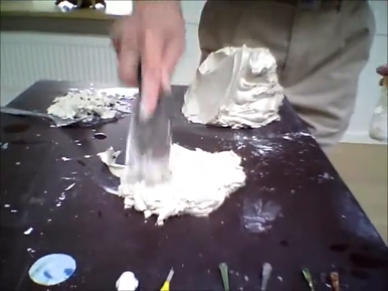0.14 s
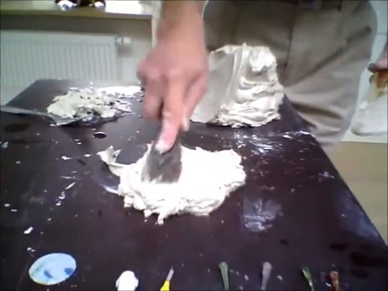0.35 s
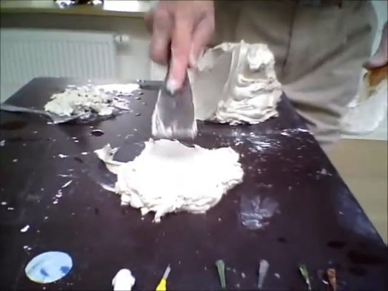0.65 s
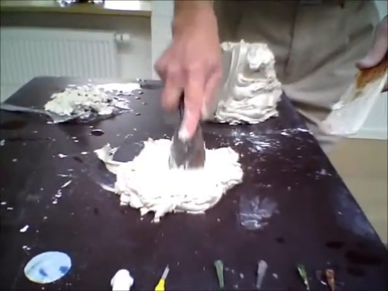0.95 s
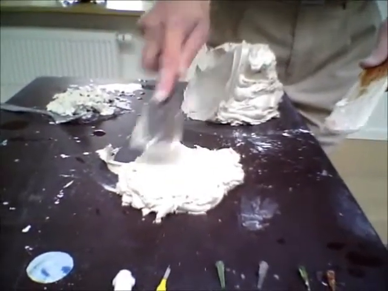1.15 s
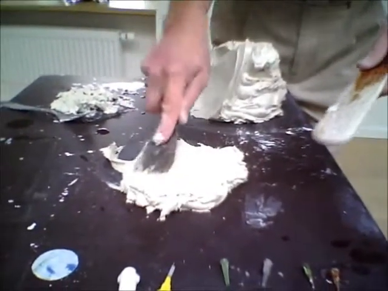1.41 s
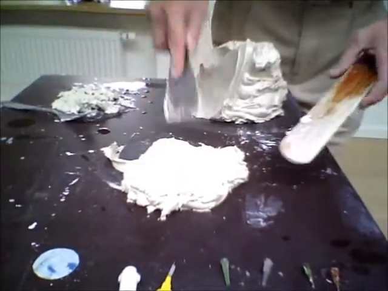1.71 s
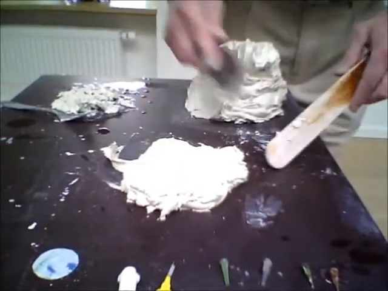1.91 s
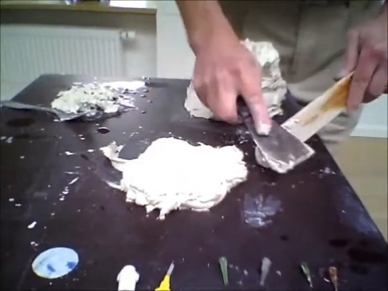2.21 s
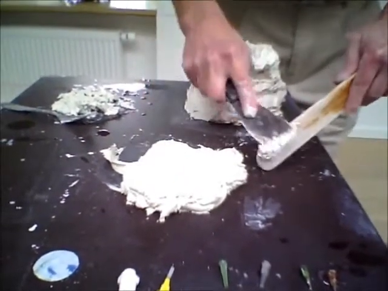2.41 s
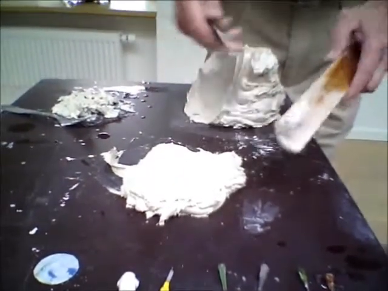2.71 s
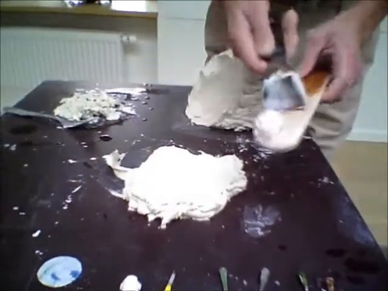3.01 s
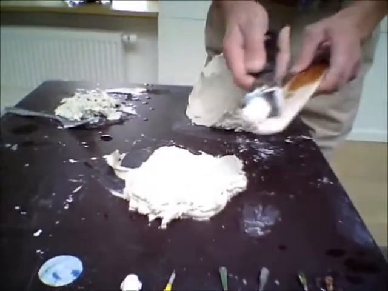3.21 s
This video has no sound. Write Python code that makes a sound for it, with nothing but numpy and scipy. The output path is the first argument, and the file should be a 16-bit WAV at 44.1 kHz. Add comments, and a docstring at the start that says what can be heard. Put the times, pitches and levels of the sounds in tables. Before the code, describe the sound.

A steel palette knife pats and smears sticky clay on a table with light ticks. It knocks twice on a wooden spatula, scrapes off with a loud clack, then taps and wipes. Close microphone, slightly live room, faint hum.

```python
"""A steel palette knife pats and smears soft clay on a table. The blade ticks on the tabletop, knocks three
times against a wooden spatula, scrapes along it and snaps off its end with a loud clack; then it taps the
spatula again and wipes the clay onto it. Blows ring as decaying modes; rubbing is a stream of tiny slips,
filtered by steel or clay. The room is slightly live, with a faint hum."""
import sys
import numpy as np
from scipy import signal
from scipy.fft import rfft, irfft
from scipy.io import wavfile

SR = 44100
rng = np.random.default_rng(int(sys.argv[2]) if len(sys.argv) > 2 else 0)


def unload_wav(signal):
    """Save mono or channel-first audio to the path in sys.argv[1] as 16-bit WAV at rate SR, clipped to [-1, 1]."""
    wavfile.write(
        sys.argv[1],
        SR,
        np.round(np.clip(np.atleast_2d(signal).T, -1, 1) * 32767).astype(np.int16),
    )


N = 147735
T, F = np.arange(N) / SR, np.fft.rfftfreq(2 * N, 1 / SR)


def amp(db):
    """Decibels to gain."""
    return 10 ** (np.asarray(db) / 20)


def unit(x):
    """Scale to rms 1."""
    return x / np.std(x)


def peak(x, db):
    """Scale to a peak level."""
    return x * amp(db) / np.abs(x).max()


def burst(x, db):
    """Scale to the energy of 10 ms at this rms level."""
    return x * amp(db) * np.sqrt(SR / 100 / np.sum(x ** 2))


def puff(noise, s, decay_s, db):
    """Noise burst with a sharp onset."""
    t = T[:SR // 20]
    return burst(noise[int(s * SR):][:len(t)] * np.exp(-t / decay_s), db)


def add(track, s, sound):
    """Mix a sound in at s seconds."""
    i = int(s * SR)
    track[i:i + len(sound)] += sound[:N - i]


def across(points):
    """Join (Hz, value) points on a log-frequency axis."""
    hz, value = np.array(points, float).T
    return np.interp(np.log(F + 1), np.log(hz), value)


def colour(points):
    """Response through (Hz, dB) points."""
    return amp(across(points))


def resonances(rows):
    """Response of (Hz, width Hz, dB) resonances."""
    return sum(amp(db) * 1j * F * width / (hz ** 2 - F ** 2 + 1j * F * width) for hz, width, db in rows)


def shape(x, response):
    """Filter by a frequency response."""
    return irfft(rfft(x, 2 * N) * response)[..., :N]


def envelope(curve):
    """Gain along an (s, dB) curve, silent outside it."""
    s, db = np.array(curve).T
    return amp(np.interp(T, s, db, left=-np.inf, right=-np.inf))


def ring(modes, rise_s=1e-4):
    """Decaying (Hz, dB, t60 s) modes after one blow, each slightly detuned."""
    t, tones = T[:SR // 3], 0
    for k, (hz, db, t60) in enumerate(modes):
        detune = 1 + .008 * rng.standard_normal()
        tones += (-1) ** k * amp(db - 60 * t / t60) * np.sin(2 * np.pi * hz * detune * t)
    return tones * (1 - np.exp(-t / rise_s))


def friction(per_s=6200, spread_db=1.5):
    """Dense tiny slips, a few of them larger; rms 1."""
    size = amp(spread_db * np.minimum(rng.exponential(size=N), 6))
    slips = rng.random(N) < per_s / SR
    return unit(slips * size * rng.choice([-1, 1], N))


# Air spectrum, side minus mid, left minus right. Each row: frequency in Hz, gain in dB.
AIR_COLOUR = [(12, -38), (20, -1.5), (140, -14), (161, -18), (319, -21.5), (400, -24.5), (4940, -38.5),
              (14000, -42.5)]
AIR_WIDTH = [(30, 8), (130, -4), (2000, -3.5), (8000, 0.5)]
AIR_PAN = [(30, -6), (80, 0), (160, -2), (1000, 0), (10000, 0)]

def background(air_db=-63, hum_hz=138.4, hum_db=-73, whine_hz=13800, whine_db=-87.5):
    """Low rumble, faint hiss, a steady hum and a thin electrical whine."""
    mid, side = shape(rng.standard_normal((2, N)), colour(AIR_COLOUR))
    side = shape(side, colour(AIR_WIDTH))
    tilt = amp(across(AIR_PAN) / 2)
    air = shape(np.array([mid + side, mid - side]), np.array([tilt, 1 / tilt])) / np.std(mid)
    hum = amp(hum_db) * np.sin(2 * np.pi * hum_hz * T)
    whine = amp(whine_db) * np.sin(2 * np.pi * whine_hz * T)
    return amp(air_db) * air + np.sqrt(2) * (hum + whine)


# Room decay. Each row: frequency in Hz, t60 in seconds.
TAIL_T60 = [(200, 0.75), (1000, 0.52), (3000, 0.75), (6000, 0.67), (13000, .9)]
# Tail spectrum; room side minus mid. Each row: frequency in Hz, gain in dB.
TAIL_COLOUR = [(150, -13), (500, -11.5), (1200, -13.5), (3000, -12.5), (6000, -19.5), (13000, -26)]
ROOM_WIDTH = [(1000, -5), (4000, -3.5)]

def room(x, early_db=-12, early_s=0.01, tail_rise_s=0.011):
    """Early reflections and a diffuse tail, different at each ear."""
    t, ears = T[:SR], []
    band_hz, t60s = np.array(TAIL_T60).T
    bands = [across(list(zip(band_hz, weights))) for weights in np.eye(len(band_hz))]
    for _ in range(2):
        noise = rng.standard_normal(SR) * (1 - np.exp(-t / tail_rise_s))
        tails = [noise * amp(-60 * t / t60) for t60 in t60s]
        late = sum(band * rfft(tail / np.linalg.norm(tail), 2 * N) for band, tail in zip(bands, tails))
        echoes = rng.standard_normal(SR) * t * np.exp(-2 * t / early_s)
        early = rfft(echoes / np.linalg.norm(echoes), 2 * N)
        ears.append(shape(x, late * colour(TAIL_COLOUR) + amp(early_db) * early))
    left, right = ears
    mid, side = left + right, shape(left - right, colour(ROOM_WIDTH))
    return np.array([mid + side, mid - side]) / np.sqrt(2)


# Each row: start in seconds, peak level in dB.
LOW_BUMPS = [(1.565, -49), (1.602, -44)]

def bumps(hz=68, t60_s=0.035):
    """Something bumps softly: one low, damped mode."""
    out = np.zeros(N)
    for s, db in LOW_BUMPS:
        add(out, s, peak(ring([(hz, 0, t60_s)], rise_s=0.004), db))
    return out


# Each row: frequency in Hz, gain in dB, t60 in seconds.
POP_MODES = [(247, -1.5, 0.059), (503, -7, 0.15)]

def pop(start_s=1.682, peak_db=-54.5):
    """Sticky clay lets go with a faint, ringing pop."""
    out = np.zeros(N)
    add(out, start_s, peak(ring(POP_MODES), peak_db))
    return out


# Bright crack and wet squelch, also in the ticks. Each row: frequency in Hz, gain in dB.
CRACK_SPECTRUM = [(1000, -28), (4500, 1), (8300, 1), (10500, -4.5), (14000, 0.5)]
SQUELCH_SPECTRUM = [(250, -20), (600, 3.5), (1400, -1.5), (2400, 2), (4000, -8), (9000, -32)]
# Each row: start in seconds, level in dB.
THREAD_SNAPS = [(0.03, -68), (0.978, -65), (1.017, -64), (1.113, -63.5), (1.141, -64), (1.18, -70.5),
                (1.233, -62), (1.847, -62.5)]

def crackles(decay_s=.0018, squelch_db=4):
    """Threads of sticky clay snap as the blade drags over them."""
    out = np.zeros(N)
    spectrum = colour(CRACK_SPECTRUM) + amp(squelch_db) * colour(SQUELCH_SPECTRUM)
    snap = shape(rng.standard_normal(N), spectrum)
    for s, db in THREAD_SNAPS:
        add(out, s, puff(snap, s, decay_s, db))
    return out


# Each row: crest, rise and fall in seconds, clay level in dB, edge relative to clay in dB.
STROKES = [(.14, 0.074, 0.046, -71.5, -10), (.405, 0.011, 0.027, -60, -4), (.715, 0.027, 0.027, -67.5, -11),
           (0.979, 0.037, 0.14, -66, -30), (1.246, 0.084, 0.023, -66.5, -13),
           (1.821, 0.051, 0.03, -69.5, -1), (1.976, 0.063, 0.047, -60.5, -1),
           (2.07, 0.05, 0.064, -67.5, -10), (2.2, 0.024, 0.057, -67, -5.5),
           (3.061, 0.043, 0.029, -65.5, -3)]
# Each row: frequency in Hz, gain in dB.
CLAY_COLOUR = [(300, -5), (600, -18.5), (980, -3), (1400, -11.5), (2200, 2), (2750, -12), (4300, -5),
               (5500, -12.5), (8400, -7), (14000, -9)]
# Each row: frequency and width in Hz, gain in dB.
EDGE_RESONANCE = [(3300, 320, 0)]

def smears():
    """Wet clay crackles under the blade as each stroke swells and fades; the dragged edge sings."""
    out = np.zeros(N)
    clay = unit(shape(friction(per_s=2000), colour(CLAY_COLOUR)))
    edge = unit(shape(friction(), resonances(EDGE_RESONANCE)))
    for s, rise_s, fall_s, db, edge_db in STROKES:
        swell = np.exp(-((T - s) / np.where(T < s, rise_s, fall_s)) ** 2)
        out += amp(db) * swell * (clay + amp(edge_db) * edge)
    return out


# Each row: start in seconds, blade, crack and squelch levels in dB, smack in Hz, smack level in dB.
BLADE_TICKS = [(.163, -68, -69, -62.5, 970, -83), (0.216, -68.5, -80, -65.5, 1000, -82),
               (.398, -66, -72, -65, 1050, -59), (0.406, -53.5, -54.5, -62, 997, -55),
               (0.53, -99, -72, -68.5, 970, -69), (0.558, -87, -75, -69, 950, -71.5),
               (0.6, -85, -69, -67, 890, -64), (0.654, -69, -66, -67.5, 950, -73),
               (0.7071, -63.5, -58, -87, 900, -65), (0.719, -71, -70, -84, 764, -63),
               (.960, -41, -44.5, -57, 990, -48.5), (1.248, -67.5, -70, -66, 970, -63.5),
               (1.263, -83, -67, -64.5, 850, -62.5), (1.442, -75, -66, -68.5, 930, -58.5),
               (1.4507, -59, -56, -60.5, 1040, -61), (1.7295, -69.5, -59, -65, 980, -73),
               (1.837, -65, -67, -67, 815, -60.5)]
# Blade pressed on the table. Each row: frequency in Hz, gain in dB, t60 in seconds.
BLADE_MODES = [(2266, -12, 0.019), (3457, 8.5, 0.0075), (8180, -10, 0.012)]

def ticks(pitch_spread=0.064, rise_s=0.00088, smack_t60_s=0.017):
    """The blade cracks on the table and rings at a pitch set by the grip; clay squelches and smacks."""
    out = np.zeros(N)
    crack = shape(rng.standard_normal(N), colour(CRACK_SPECTRUM))
    squelch = shape(rng.standard_normal(N), colour(SQUELCH_SPECTRUM))
    for s, blade_db, crack_db, squelch_db, smack_hz, smack_db in BLADE_TICKS:
        grip = 1 + pitch_spread * rng.uniform(-0.82, 1)
        modes = [(hz * grip, db, t60) for hz, db, t60 in BLADE_MODES]
        add(out, s, burst(ring(modes, rise_s), blade_db))
        add(out, s, burst(ring([(smack_hz, 0, smack_t60_s)], rise_s), smack_db))
        add(out, s, puff(crack, s, decay_s=0.0027, db=crack_db))
        add(out, s, puff(squelch, s, decay_s=0.0057, db=squelch_db))
    return out


# Each row: start in seconds, wood and table levels in dB, table tilt in dB per octave,
# click and shudder levels in dB.
DULL_KNOCKS = [(2.0418, -45, -42, 5, -57.5, -54.5), (2.157, -56.5, -42, -1, -57, -60),
               (2.296, -65, -56.5, -9, -71.5, -61.5)]
# Each row: frequency in Hz, gain in dB, t60 in seconds.
WOOD_MODES = [(734, -5, 0.079), (900, -5, 0.031), (1113, -0.5, 0.032), (2073, -12.5, 0.035),
              (3270, -12, 0.034)]
TABLE_MODES = [(190.5, -3.5, 0.21), (299, -6.5, 0.21), (384, -1.5, 0.057), (448, -11.5, 0.12),
               (538.5, -6.5, 0.088)]
# Each row: frequency and width in Hz, gain in dB.
CLICK_RESONANCES = [(2000, 430, 20), (2660, 450, -14), (3350, 180, -14)]
# Each row: frequency in Hz, gain in dB.
SHUDDER_COLOUR = [(90, -26), (150, -7), (500, -5), (1000, -15.5), (1600, -26), (5000, -29.5)]

def knocks(table_lag_s=0.0037, shudder_s=0.089, click_top_hz=3350):
    """A click; the wooden spatula answers, then the heavier table, which shudders briefly."""
    out = np.zeros(N)
    shudder = unit(shape(rng.standard_normal(N), colour(SHUDDER_COLOUR)))
    click = shape(rng.standard_normal(N), resonances(CLICK_RESONANCES) / (1 + (F / click_top_hz) ** 4))
    for s, wood_db, table_db, tilt, click_db, shudder_db in DULL_KNOCKS:
        table = [(hz, db + tilt * np.log2(hz), t60) for hz, db, t60 in TABLE_MODES]
        add(out, s, puff(click, s, decay_s=0.0037, db=click_db))
        add(out, s, burst(ring(WOOD_MODES), wood_db))
        add(out, s + table_lag_s, burst(ring(table), table_db))
        out += amp(shudder_db) * (T >= s) * np.exp(-np.abs(T - s) / shudder_s) * shudder
    return out


# Each row: frequency in Hz, gain in dB, t60 in seconds.
SPATULA_MODES = [(1025, -1.5, 0.013), (1937, -3.5, 0.02), (2145, 4.5, 0.0072), (2730, -15, 0.023),
                 (3410, -11, 0.015), (3990, -8, 0.015), (4760, -13.5, 0.014)]

def landing(start_s=3.1903, peak_db=-32.5):
    """The knife lands on the lifted spatula and rings it."""
    out = np.zeros(N)
    add(out, start_s, peak(ring(SPATULA_MODES, rise_s=0.0019), peak_db))
    return out


# Each row: time in seconds, level in dB.
WIPE_LEVELS = [(3.185, -68), (3.198, -52.5), (3.23, -64), (3.265, -56.5), (3.31, -66.5), (3.35, -64.5)]
# Each row: frequency in Hz, gain in dB.
WIPE_SPECTRUM = [(300, -9), (750, -8), (1050, -11), (1400, -5.5), (2150, -6.5), (2800, -3.5), (4300, -10),
                 (5700, -16.5), (7200, -10.5), (14000, -12)]

def wipe():
    """Steel rubs along the spatula, cushioned by clay."""
    return envelope(WIPE_LEVELS) * unit(shape(friction(), colour(WIPE_SPECTRUM)))


# Each row: time in seconds, level in dB.
SCRAPE_LEVELS = [(2.34, -74), (2.385, -51), (2.414, -48.5), (2.475, -59), (2.53, -58), (2.595, -61),
                 (2.615, -53), (2.634, -43.5), (2.64, -80)]
# Scraping blade. Each row: frequency and width in Hz, gain in dB.
SCRAPE_RESONANCES = [(747, 260, 3), (1430, 250, -7.5), (1860, 340, 6), (2570, 300, 3.5), (3325, 280, 4),
                     (4050, 220, -3.5), (6470, 1100, -7.5), (7630, 640, -8), (8800, 650, -9),
                     (11100, 1200, -8.5)]

def scrape(catches_per_s=220, catch_db=0.5):
    """Steel rubs hard along the spatula, gritty and ringing; the edge catches and lets go."""
    slips = friction()
    catch = unit(np.interp(T * catches_per_s, np.arange(N), rng.standard_normal(N)))
    blade = shape(slips * amp(catch_db * catch), resonances(SCRAPE_RESONANCES))
    return envelope(SCRAPE_LEVELS) * unit(blade)


def strike(force, response):
    """Drive a body whose response is scaled to unit mean power."""
    return shape(force, response / np.sqrt(np.mean(np.abs(response) ** 2)))


# Each row: start in seconds, level in dB, decay in seconds, favoured resonance in Hz, its gain in dB.
BOUNCES = [(2.6364, -25.5, 0.0038, 3580, 9.1), (2.64, -23.5, 0.0026, 870, 16),
           (2.646, -26.5, 0.0029, 3720, 3.8), (2.649, -17.5, 0.0027, 1490, 2.5),
           (2.666, -25.5, 0.0053, 2000, 1)]
# Free blade. Each row: frequency and width in Hz, gain in dB.
CLACK_RESONANCES = [(127, 130, 0.5), (803, 38, 7.5), (930, 120, 8.5), (1287, 39, 11), (1570, 250, 9.5),
                    (2430, 200, 7), (2650, 99, 0.5), (3300, 260, 2.5), (3700, 89, 3.5), (4200, 400, 7),
                    (6600, 150, 6.5), (7190, 150, -10), (8200, 1100, -10), (11500, 1600, -5.5)]
# Clack spreading in all directions. Each row: frequency in Hz, gain in dB.
WALL_COLOUR = [(200, -2), (500, 7), (900, 7.5), (1500, 6), (2600, 6.5), (4300, 6), (5600, 2), (8000, 1.5),
               (13000, 0.5)]

def clack(snap_s=2.650, snap_db=-2, crack_db=-9.5, crack_low_hz=200, thud_db=-43.5):
    """The blade chatters off the spatula's end and rings; one sharp snap jolts the table."""
    blade = resonances(CLACK_RESONANCES) + amp(crack_db) * 1j * F / (crack_low_hz + 1j * F)
    contacts = friction(per_s=9000, spread_db=0.5)
    snap = np.zeros(N)
    add(snap, snap_s, [amp(snap_db)])
    out = strike(snap, blade)
    for s, db, decay_s, hz, spot_db in BOUNCES:
        force = amp(db) * (T >= s) * np.exp(-np.abs(T - s) / decay_s) * contacts
        spot = 1.5 + resonances([(hz, 0.16 * hz, spot_db)])  # each spot favours one resonance
        out += strike(force, blade * spot)
    add(out, snap_s, burst(ring(TABLE_MODES), thud_db))
    return out


def clack_to_walls():
    """Each bounce sends its energy into the room as one broad pulse."""
    pulses = np.zeros(N)
    for s, db, decay_s, _, _ in BOUNCES:
        add(pulses, s, [amp(db) * np.sqrt(decay_s * SR / 2)])
    return shape(pulses, colour(WALL_COLOUR))


# Each row: frequency in Hz, left minus right in dB.
DIRECT_PAN = [(200, 3), (2000, 0.1), (5000, -0.5), (13000, 2.5)]

def scene(right_lag_samples=1.0, tick_send_db=-1):
    """The tools at two close microphone ports, in the room; clay shields the walls from the ticks."""
    taps = ticks()
    tools = crackles() + smears() + knocks() + landing() + pop() + bumps() + scrape() + wipe()
    reverb = room(tools + amp(tick_send_db) * taps + clack_to_walls())
    tilt = amp(across(DIRECT_PAN) / 2)
    lag = np.exp(-2j * np.pi * F * right_lag_samples / SR)
    direct = shape(tools + taps + clack(), np.array([tilt, lag / tilt]))
    return direct + reverb + background()


def record(dry):
    """Steep low-pass at 13750 Hz."""
    return signal.sosfilt(signal.ellip(10, .2, 80, 13750, fs=SR, output="sos"), dry)


dry = scene()
out = record(dry)
unload_wav(out)
```